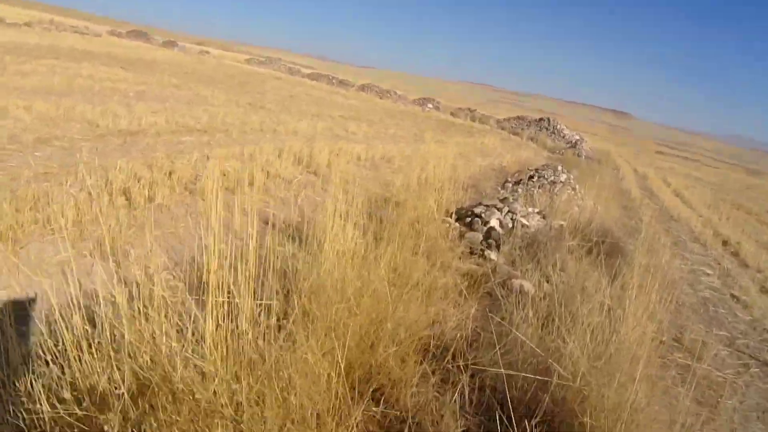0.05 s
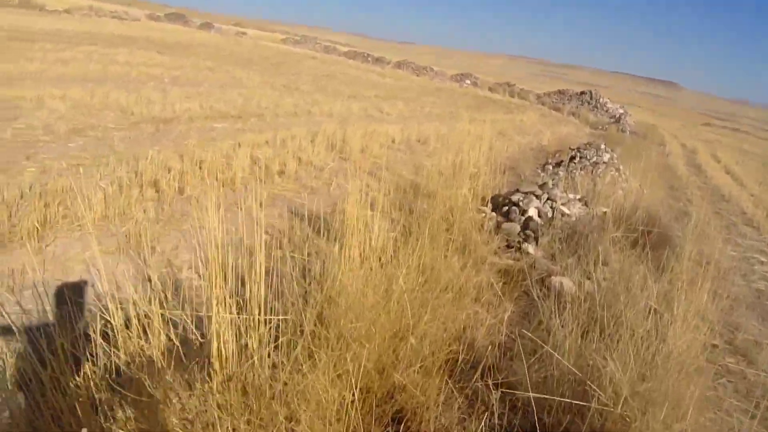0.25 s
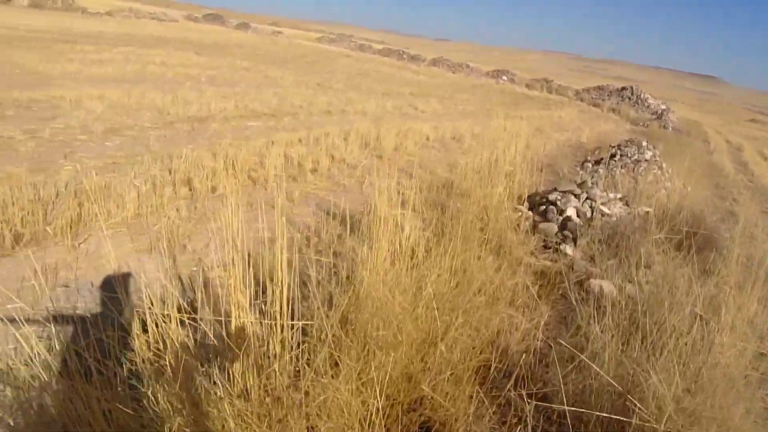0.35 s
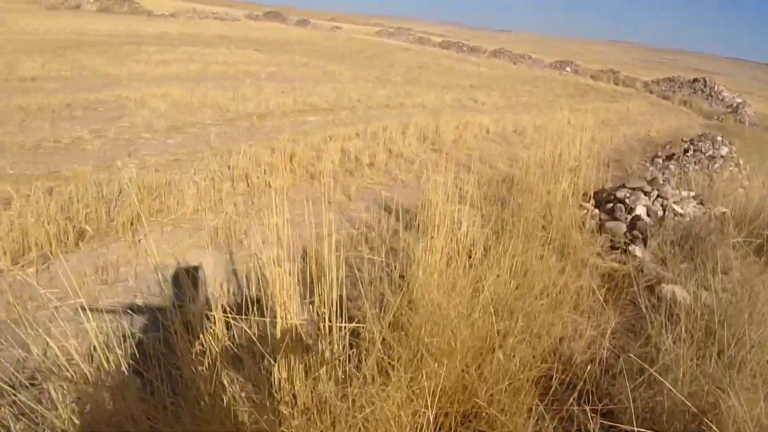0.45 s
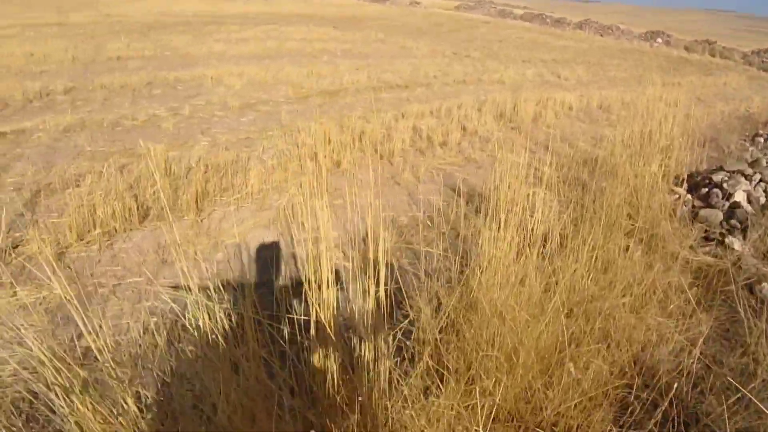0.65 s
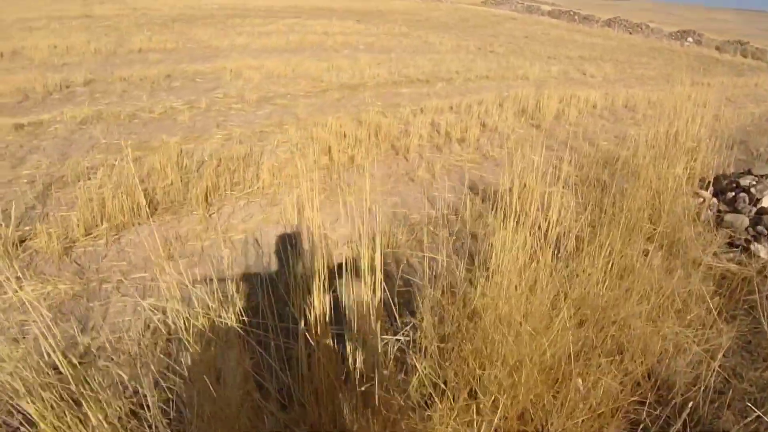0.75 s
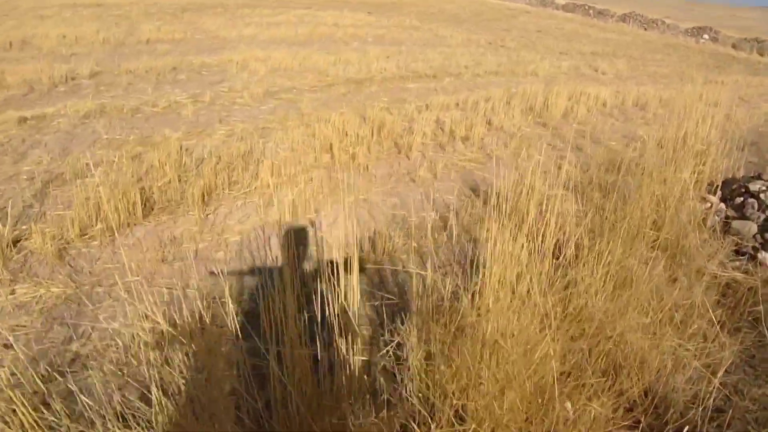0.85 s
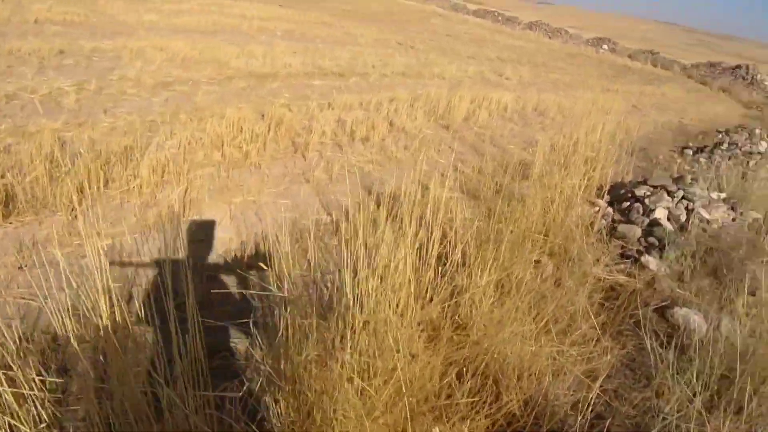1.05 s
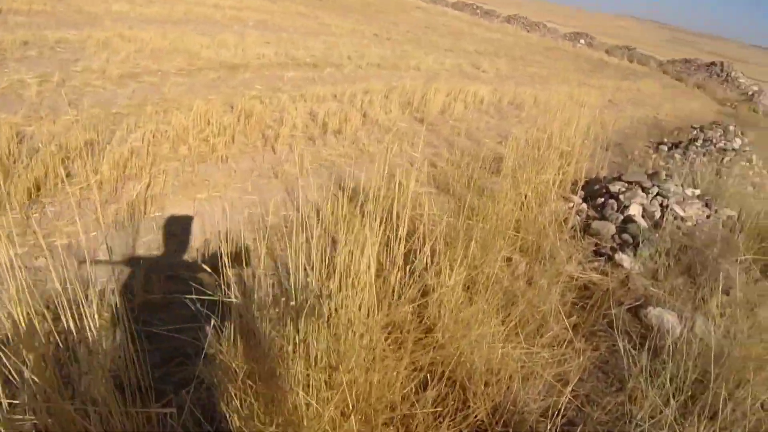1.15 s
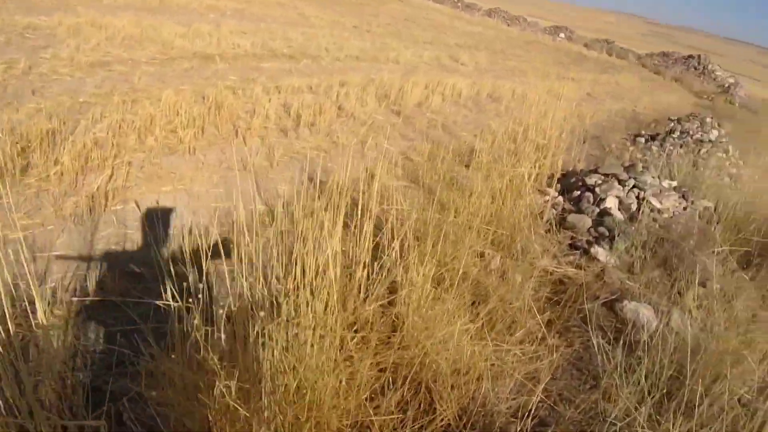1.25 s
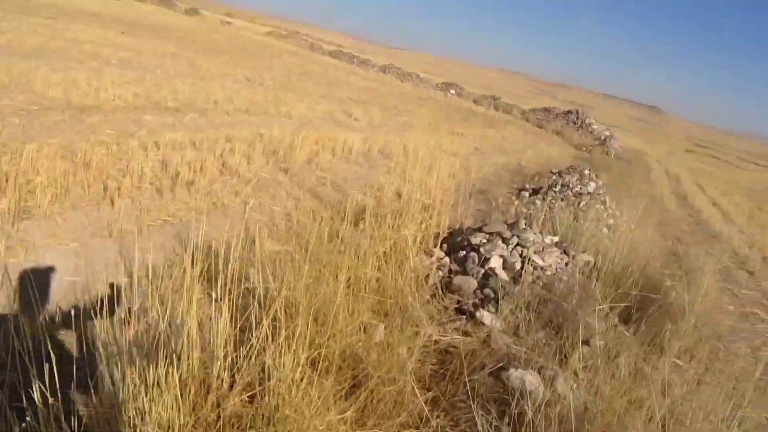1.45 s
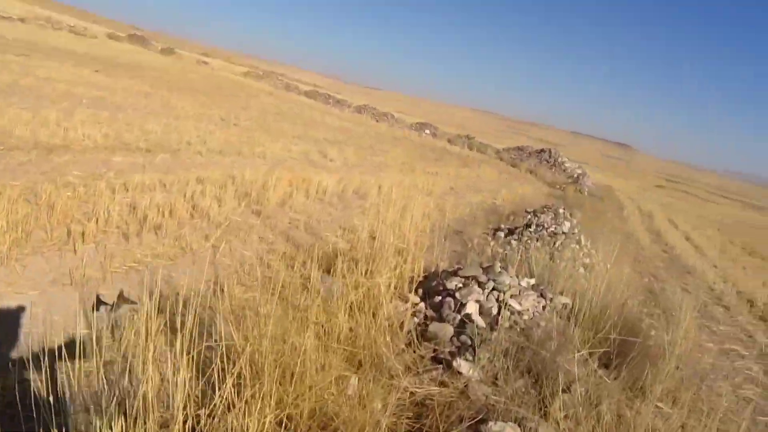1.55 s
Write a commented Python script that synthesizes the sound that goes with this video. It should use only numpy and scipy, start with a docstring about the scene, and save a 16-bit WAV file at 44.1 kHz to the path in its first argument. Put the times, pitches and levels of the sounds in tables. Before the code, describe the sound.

A bird bursts up with rapid, thumping wingbeats and whirrs away across an open field. Then dry stalks rustle and snap as someone wades on, while light wind rushes and briefly bumps the microphone.

```python
"""Light wind and a rustle of dry grass; then a bird bursts out and whirrs off in ten quick wingbeats.
Each beat shoves the air into a low thump and sets the feathers fluttering with a rasp and a whistle.
Someone wades on through the stalks, which tick as they brush past and crack as they break.
Three puffs of wind bump the right microphone port; the left channel is much weaker throughout."""
import sys
import numpy as np
from scipy import signal
from scipy.fft import rfft, irfft, next_fast_len
from scipy.io import wavfile
from scipy.ndimage import map_coordinates

SR = 44100
rng = np.random.default_rng(int(sys.argv[2]) if len(sys.argv) > 2 else 0)


def int16_out(signal):
    """Quantize to a 16-bit WAV file."""
    q = np.round(np.clip(np.atleast_2d(signal).T, -1, 1) * 32767)
    wavfile.write(sys.argv[1], SR, q.astype(np.int16))


N = 70560

# The wingbeats. Each row: start in seconds, thump level, rasp level, rasp pitch in Hz, swish level,
# whistle level, whistle pitch in Hz. Levels in all tables are in relative dB.
WINGBEATS = [(.3130, -21.5, -23, 1380, -26.5, -34.5, 4250), (.3400, -13.5, -23, 1650, -20.5, -22, 4610),
             (0.3739, -12.5, -20.5, 1600, -17, -21.5, 4950),
             (0.4075, -10.5, -18.5, 1830, -17.5, -19.5, 5300),
             (0.441, -14.5, -17.5, 1720, -20, -21.5, 5300), (0.4752, -13.5, -18.5, 1780, -18, -22.5, 5350),
             (.5090, -10.5, -17.5, 1880, -17.5, -27, 5350), (.5445, -8, -17, 1880, -19.5, -27, 5300),
             (0.5819, -9, -20.5, 1850, -21.5, -31.5, 5400), (0.6204, -8, -19.5, 1419, -39, -36, 5300)]


def amp(db):
    return 10 ** (np.asarray(db) / 20)


def unit_rms(x):
    return x / np.sqrt(np.mean(x ** 2) + 1e-20)


def clock():
    return np.arange(N) / SR


def envelope(points):
    """Gain per sample, interpolated between points of time in seconds and level in dB."""
    return amp(np.interp(clock(), *np.transpose(points)))


def wobble(knots_per_s):
    """Slow noise: a smooth curve through random knots."""
    knots = rng.standard_normal(int(N * knots_per_s / SR) + 4)
    return map_coordinates(knots, [clock() * knots_per_s])


def filtered(x, response):
    """Linear filtering: the spectrum is multiplied by a frequency response."""
    size = next_fast_len(N + 8192)
    return irfft(rfft(x, size) * response(np.fft.rfftfreq(size, 1 / SR)), size)[..., :N]


def coloured(x, spectrum):
    """Spectral shaping by points of frequency in Hz and level in dB, at unit rms."""
    points_hz, db = np.transpose(spectrum)
    return unit_rms(filtered(x, lambda hz: amp(np.interp(np.log(hz + 1), np.log(points_hz), db))))


def two_ports(common, opposed, correlation):
    """Partial coherence: the sum and difference of two independent signals make a stereo pair."""
    angle = np.arccos(correlation) / 2
    return np.cos(angle) * common + np.sin(angle) * np.array([opposed, -opposed])


def noise_pair(correlation):
    """White noise, partly coherent between the two ports."""
    return two_ports(*rng.standard_normal((2, N)), correlation)


def port_leak(x, cutoff_hz=85):
    """First-order high-pass: the port lets steady pressure leak away."""
    return filtered(x, lambda hz: 1j * hz / (cutoff_hz + 1j * hz))


def left_lead(x, seconds):
    """Arrival-time difference: sound reaches the left port before the right."""
    return filtered(x, lambda hz: np.exp(1j * np.pi * hz * seconds * np.array([[1], [-1]])))


def flutter(hz, width_hz, steadiness):
    """Narrow-band noise: random modulation blurs a tone; steadiness evens out its amplitude."""
    modulation = wobble(width_hz) + 1j * wobble(width_hz)
    modulation /= (np.abs(modulation) + 1e-6) ** steadiness
    return unit_rms(np.real(modulation * np.exp(2j * np.pi * np.cumsum(hz) / SR)))


def wind():
    """Turbulence: unsteady air makes a soft rush over the field and an uneven rumble at the ports."""
    # Strength of the wind. Each row: time in seconds, level in dB.
    rush_levels = [(0, -35.5), (.06, -39.5), (.2, -34), (.27, -34), (.31, -33.5), (.45, -35), (.62, -32.5),
                   (.72, -46.5), (.8, -43), (.89, -40), (.93, -34), (1.01, -36.5), (1.065, -32.5),
                   (1.15, -38.5), (1.27, -33), (1.39, -36.5), (1.435, -34), (1.47, -38.5), (1.6, -41.5)]
    rumble_levels = [(0, -43), (.2, -59), (.35, -43), (.66, -39.5), (.76, -53.5), (.88, -41), (1.0, -53),
                     (1.08, -33.5), (1.28, -39), (1.37, -41.5), (1.48, -38.5), (1.6, -41)]
    # Its spectra. Each row: frequency in Hz, level in dB.
    rush_spectrum = [(60, -23), (160, -5.5), (300, 0), (450, 0.5), (650, 0.5), (1000, -2), (1500, -10),
                     (2500, -14.5), (6000, -26)]
    rumble_spectrum = [(15, -22), (35, -6.5), (65, -0.5), (110, -4.5), (200, -13), (500, -37)]
    rush = envelope(rush_levels) * amp(1.1 * wobble(34.78)) * coloured(noise_pair(0.97), rush_spectrum)
    gusts = amp(wobble(20))
    return rush + envelope(rumble_levels) * gusts * coloured(noise_pair(0.58), rumble_spectrum)


def grass(ticks_per_s=900, tick_decay_s=0.0011, tick_share=0.45):
    """Shot noise: brushing stalks give dense tiny ticks, and a duller crunch where pressed down."""
    # Strength of the brushing and pressing. Each row: time in seconds, level in dB.
    rustle_levels = [(0, -39.5), (.06, -44.5), (.09, -38), (.15, -40), (.33, -35.5), (.37, -31.5),
                     (.47, -25.5), (.55, -34.5), (.62, -36.5), (.65, -30), (.73, -42.5), (.79, -43),
                     (.88, -38), (.95, -32.5), (1.01, -35.5), (1.11, -28.5), (1.15, -34), (1.17, -28),
                     (1.33, -31), (1.39, -37), (1.42, -41.5), (1.6, -44.5)]
    early_crunch = [(0, -43), (.25, -41), (.62, -32.5)]
    late_crunch = [(0.72, -47), (0.768, -48.5), (0.884, -42.5), (1.096, -37), (1.136, -48), (1.21, -34),
                   (1.414, -41), (1.44, -54), (1.55, -46.5)]
    # Their spectra. Each row: frequency in Hz, level in dB.
    rustle_spectrum = [(2500, -30), (5000, -12), (7500, -10.5), (10500, -5.5), (13000, 0), (14500, 4),
                       (15500, -5.5)]
    crunch_spectrum = [(700, -21), (1500, 1.5), (2200, -2), (3200, -2.5), (5000, -5.5), (7500, -8),
                       (12000, -6.5)]
    contacts = rng.random(N) < ticks_per_s / SR
    strengths = np.exp(0.4 * np.clip(rng.standard_normal(N), -2, 2))
    ticks = unit_rms(signal.lfilter([1], [1, -np.exp(-1 / (tick_decay_s * SR))], contacts * strengths))
    texture = np.sqrt(1 - tick_share + tick_share * ticks ** 2)
    rustle_gain = amp(3.5 + 1.2 * wobble(41.2)) * envelope(rustle_levels)
    rustle = coloured(texture * noise_pair(0.38), rustle_spectrum)
    crunch_gain = amp(2 + 0.45 * wobble(39.2)) * envelope(early_crunch + late_crunch)
    crunch = coloured(np.sqrt(texture) * noise_pair(0.97), crunch_spectrum)
    return rustle_gain * rustle + crunch_gain * crunch


def wing_thumps(thump_hz=354, t60_s=0.026, push_s=0.0013):
    """Damped oscillation: each beat shoves the air, giving a short push and a low, fast-dying swing."""
    out = np.zeros(N)
    for start, db, *_ in WINGBEATS:
        age = np.maximum(clock() - start, 0)
        hz = thump_hz * (1 + rng.normal(0, 0.016))
        swing = np.sin(2 * np.pi * hz * age) * amp(-60 * age / t60_s)
        push = amp(-13) * age / push_s * np.exp(1 - age / push_s)
        out += amp(db - 1.5) * (swing + push)
    return port_leak(out)


def feathers(last_beat_s=0.021, correlation=0.75):
    """Aeroelastic flutter: each stroke draws an arching rasp, a rising whistle and a swish."""
    starts, _, rasp_db, rasp_hz, swish_db, whistle_db, whistle_hz = np.transpose(WINGBEATS)
    count = len(starts)
    cycle = np.interp(clock(), np.append(starts, starts[-1] + last_beat_s), np.arange(count + 1))
    beat = np.minimum(cycle.astype(int), count - 1)
    progress = cycle - beat  # 0 to 1 within each beat
    rise = np.sin(np.pi / 2 * np.clip((progress - 0.16) / 0.36, 0, 1))
    fall = np.sin(np.pi / 2 * np.clip((1 - progress) / 0.19, 0, 1))
    between_strokes = amp(-13.5) * (cycle > 0) * (cycle < count)
    stroke = np.maximum(rise * fall, between_strokes)
    arching_hz = rasp_hz[beat] * (1 + 0.14 * (np.sin(np.pi * progress) ** 2 - 0.65))
    fundamental = flutter(arching_hz, width_hz=420, steadiness=0.65)
    overtone = amp(-14.5) * stroke * flutter(1.75 * arching_hz, width_hz=800, steadiness=0.23)
    rasp = amp(rasp_db[beat]) * (fundamental + overtone)
    rising_hz = whistle_hz[beat] * (1 + 0.151 * (progress - 0.5))
    tones = [flutter(rising_hz, width_hz=720, steadiness=0.16) for _ in range(2)]
    whistle = amp(whistle_db[beat]) * two_ports(*tones, correlation)
    # Spectrum of the swish. Each row: frequency in Hz, level in dB.
    swish_spectrum = [(300, -35), (800, -22.5), (1300, -1), (2200, 1.5), (2700, -3.5), (3600, -4.5),
                      (4200, -6), (5600, -15), (6800, -17), (10000, -47)]
    swish = amp(swish_db[beat]) * coloured(noise_pair(correlation), swish_spectrum)
    return amp(-2) * stroke * (rasp + swish + whistle)


def snapping_stalks(rise_s=0.00039, fracture_s=0.00071):
    """Brittle fracture: a stalk gives a sharp crack, then a bright decaying burst with a woody body."""
    # The snaps. Each row: start in seconds, level in dB, body against treble in dB, T60 in seconds.
    snaps = [(.3660, -19.5, -4.5, 0.034), (0.423, -14, -3, 0.036), (0.471, -12, -11, .01),
             (0.6383, -4.5, -34, 0.012), (0.6482, -1, -8, 0.0084), (0.658, -22, -21, 0.013),
             (0.702, -16, -25, 0.012), (.9240, -15, -18, 0.02), (1.0869, -15, -7, 0.013),
             (1.0916, -11.5, -3, 0.013), (1.1631, -10.5, -8, 0.016), (1.1710, -17.5, -19, .007),
             (1.2172, -14.5, -2, 0.018), (1.2207, -9, -5, 0.0091), (1.2462, -10, -11, 0.014),
             (1.2572, -11, -8, 0.0065), (1.2823, -6, -11, 0.021), (1.3061, -1.5, -8, 0.0073),
             (1.3192, -8, -9, .012), (1.3376, -2.5, -27, 0.0068), (1.345, -5, -16, .008),
             (1.3582, -7.5, -2, 0.017), (1.3831, -3.5, -14.5, 0.019)]
    # Spectra of a snap. Each row: frequency in Hz, level in dB.
    treble_spectrum = [(3000, -27), (6500, -7.5), (9000, -2.5), (13000, 7), (15500, 5)]
    body_spectrum = [(400, -16), (1000, 1), (1800, -5.5), (3200, -4.5), (6000, -2.5), (9000, -5),
                     (14000, -10)]
    treble = coloured(noise_pair(0.45), treble_spectrum)
    body = coloured(noise_pair(1.0), body_spectrum)
    out = np.zeros((2, N))
    for start, db, body_db, t60_s in snaps:
        age = np.maximum(clock() - start, 0)
        attack = 1 - np.exp(-(age / rise_s) ** 2)
        fracture = np.exp(-(age / fracture_s) ** 2) * treble
        burst = amp(-60 * age / t60_s) * (treble + amp(body_db) * body)
        out += amp(db - 5) * attack * (fracture + burst)
    return out


def flying_off(beats_per_s=25):
    """Amplitude modulation: the distant wings leave a faint pulsing whirr that sinks in pitch."""
    # The receding whirr. Each row: time in seconds, level in dB, pitch in Hz.
    course = [(.62, -60, 1450), (.65, -43, 1420), (.71, -43, 1420), (.77, -48, 1310), (.87, -50, 1220),
              (.95, -70, 1200)]
    times, db, hz = np.transpose(course)
    pulse = 1 + 0.5 * np.sin(2 * np.pi * beats_per_s * clock())
    whirr = flutter(np.interp(clock(), times, hz), width_hz=300, steadiness=0.5)
    return amp(np.interp(clock(), times, db, left=-120)) * unit_rms(pulse * whirr)


def wind_bumps():
    """Pressure transients: each puff of air on the right port makes one lopsided swing."""
    # The puffs. Each row: centre in seconds, level in dB, width in seconds, skew in radians.
    puffs = [(1.0822, -16, 0.002, -0.1), (1.1281, 2, 0.0011, -0.41), (1.1942, -5.5, 0.0021, 0.45)]
    right = np.zeros(N)
    for centre, db, width, skew in puffs:
        offset = (clock() - centre) / width
        even = np.cos(skew) * (1 - offset ** 2)
        odd = np.sin(skew) * np.sqrt(np.e) * offset
        right += amp(db) * (even - odd) * np.exp(-offset ** 2 / 2)
    return port_leak(np.array([np.zeros(N), right]))


def scene():
    """Superposition in a free field: no echo, and sound reaches the weak left port a hair earlier."""
    wings = feathers() + flying_off() + wing_thumps()
    bird = left_lead(wings * amp([[0.5], [0]]), seconds=10e-6)
    field = bird + wind() + (grass() + snapping_stalks()) * amp([[-3.5], [0]])
    channel_gains = amp([[-7], [3.5]])  # left, right
    return left_lead(field, seconds=48e-6) * channel_gains + wind_bumps()


def record(dry, dip_s=1.561, dip_half_width_s=0.0059, dip_db=-27.5, top_hz=15600):
    """Clipping at full scale and band limiting; the level dips for an instant near the end."""
    dip = amp(dip_db * np.exp(-((clock() - dip_s) / dip_half_width_s) ** 4))
    return filtered(np.clip(dry * dip, -1, 1), lambda hz: hz < top_hz)


dry = scene()
out = record(dry)
int16_out(out)
```